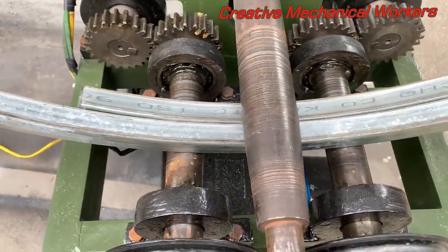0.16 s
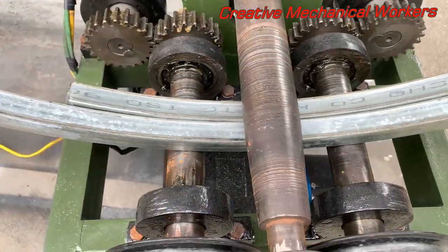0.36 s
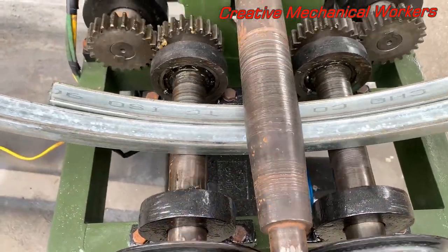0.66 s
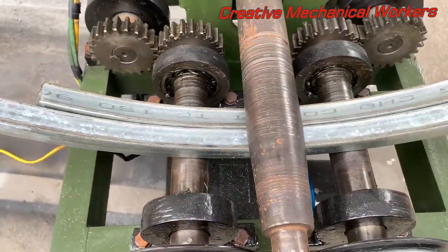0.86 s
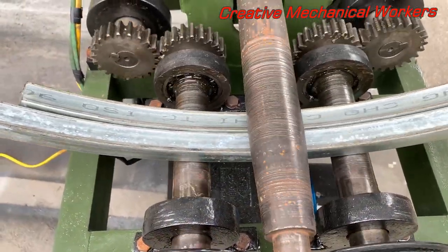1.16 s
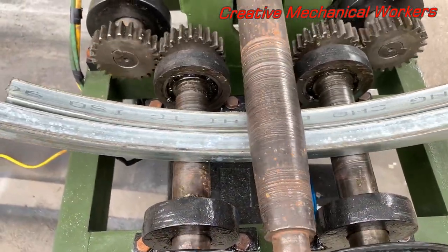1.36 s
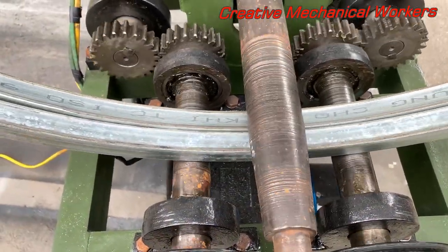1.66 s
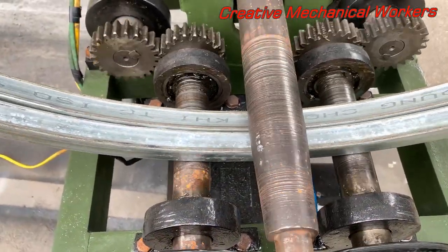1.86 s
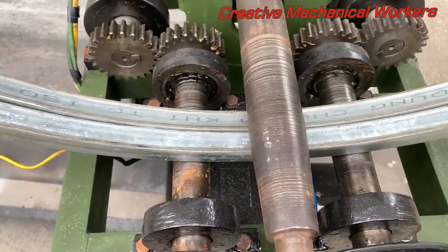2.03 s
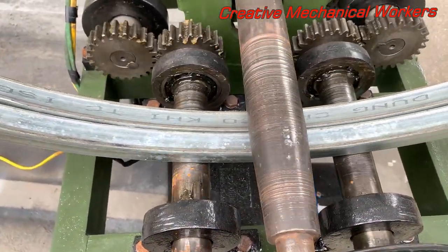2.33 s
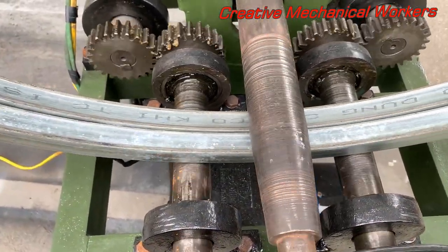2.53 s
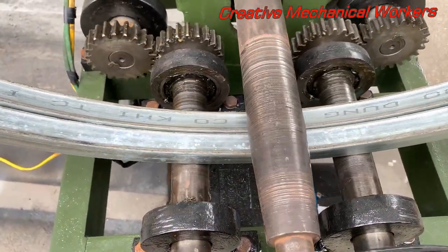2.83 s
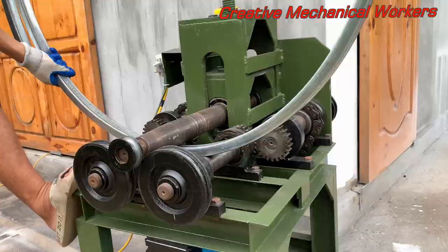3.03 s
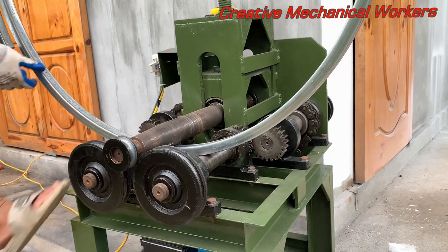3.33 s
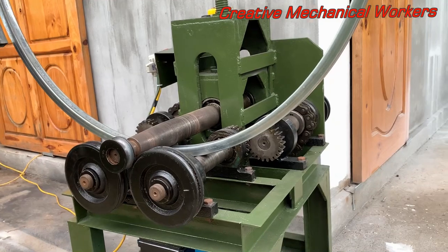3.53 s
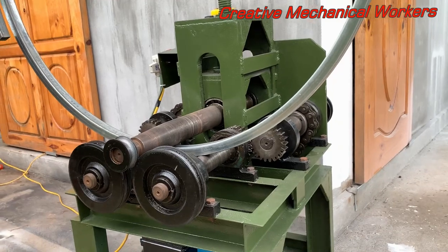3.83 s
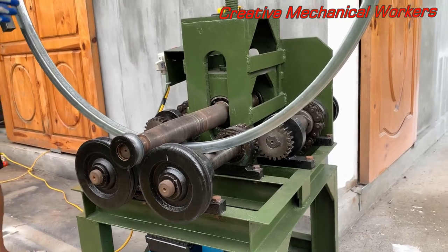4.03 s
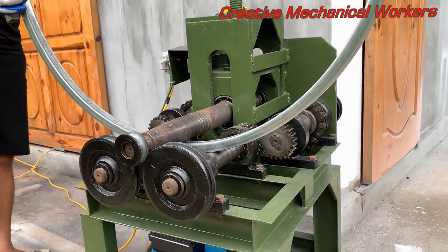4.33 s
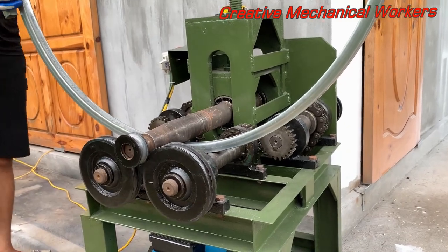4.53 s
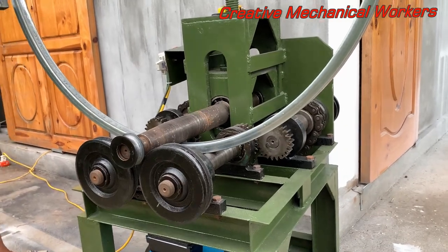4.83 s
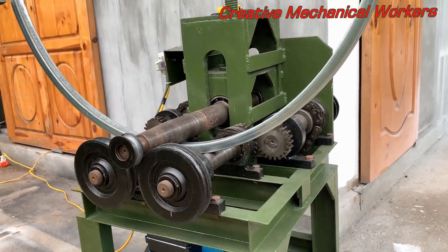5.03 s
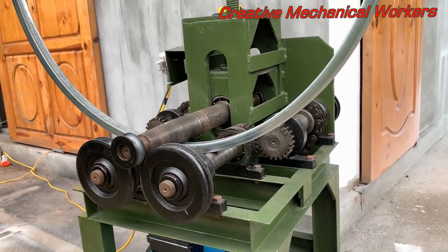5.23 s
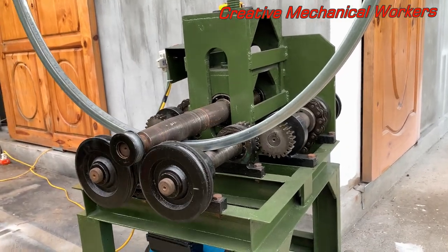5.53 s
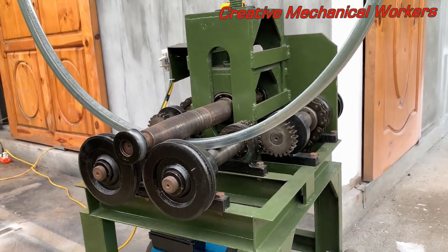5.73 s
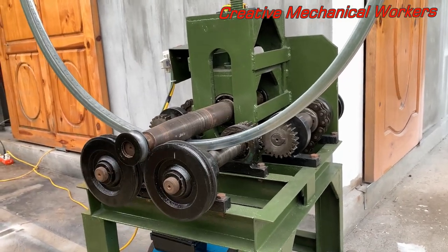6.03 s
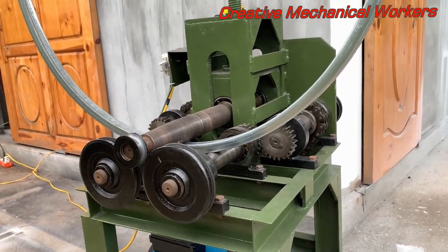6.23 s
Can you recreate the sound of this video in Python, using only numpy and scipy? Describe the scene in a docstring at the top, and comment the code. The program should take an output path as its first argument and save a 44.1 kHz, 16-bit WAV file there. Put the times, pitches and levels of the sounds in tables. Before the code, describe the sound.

An electric roller bender runs steadily, its chattering gears and ringing steel frame giving a throbbing metallic whine over rumbling bearings.

```python
"""The steel frame of an electric roller bender rings as the machine bends tube in a yard. Chattering
gear teeth drive its modes, which throb once a shaft turn, and now and then a tooth knocks hard.
Under it lie the whine of the gear mesh, the rumble and grit of bearings and rollers, and a few scuffs.
It is heard from above the rollers, then, after a short dropout, from beside the frame."""
import sys
import numpy as np
from scipy import signal
from scipy.io import wavfile
from scipy.ndimage import uniform_filter1d

SR = 44100
rng = np.random.default_rng(int(sys.argv[2]) if len(sys.argv) > 2 else 0)


def master(y):
    """Save y as 16-bit WAV."""
    cut = np.clip(np.atleast_2d(y).T, -1, 1)
    pcm = np.round(cut * 32767)  # scale
    wavfile.write(sys.argv[1], SR, pcm.astype(np.int16))


N = 281799
T = np.arange(N) / SR

# Frame modes: pitch_hz, width_hz, steadiness, swing_share, above_db, beside_db, throb_depth_above,
# throb_depth_beside, throb_phase_rad, pan_above_db, pan_beside_db (pan is left minus right)
FRAME_MODES = [(192.4, 39, 0.05, 0.57, -45, -46, .05, 0.061, -0.7, -2, -2.5),
               (395.9, 14.6, 0.69, 0.82, -32, -34, 0.37, 0.21, -0.16, 0, -2.5),
               (848, 46, 0, 0.63, -38.5, -71, 0.26, 0.15, 2.5, 1, 5),
               (932.1, 12.7, 0.7, 0.26, -34, -38.5, 0.69, 0.25, 1.8, 0, 2.5),
               (968, 13, 0, 0.86, -38, -52.5, 0.29, .2, 0.2, 2, -10),
               (1017, 42, 0.1, 0.1, -71, -43, 0.22, 0.26, 0.5, -6, -3.5),
               (1061, 41, 0, 0.29, -54.5, -42.5, 0.22, 0.51, 2.2, 1, -2),
               (1311, 150, 0.05, 1, -52.5, -40.5, 0.13, 0.18, 3.5, 10, -1),
               (1369, 146, 0, 0.57, -40, -52, 0.098, 0.13, 2.5, 3, 1),
               (1724, 22, 0, -0.5, -45, -48.5, 0.11, 0.2, 2, -4.5, -0.5),
               (1755.5, 26, 0.1, -0.5, -45.5, -48.5, 0.11, 0.2, 1, -4, -0.5),
               (1801, 32, 0, -0.93, -47, -51.5, 0.1, 0.097, 3, 7.5, -3),
               (2136, 75, 0, 0, -62, -55.5, .05, .05, 2, 4, -3),
               (2504, 81, 0, 0.14, -64, -59.5, .05, .05, 1, 0, 0),
               (2817, 80, 0.13, 0.63, -55, -51.5, .05, 0.1, -0.5, 1.5, -2.5),
               (3834, 150, 0, 0.25, -59.5, -56, .05, .05, 2, -1, 1),
               (4334, 160, 0, -0.2, -59, -58, .05, .05, 4, 4, 1.5),
               (8660, 1400, 0, -0.19, -66, -61.5, .05, 0.046, -2, -9, -6)]
# Uneven shaft, rows above and beside: rate_hz, phase_rad
SHAFT_ROTATION = [(44.81, -.2), (44.70, .25)]
# Gap between the two listening places: start_s, end_s, half_fade_out_s, half_fade_in_s, depth_db
GAP = (3.1165, 3.138, .001, .002, -34)
BESIDE = T > GAP[0] + .01


def undb(db):
    """Amplitude ratio of a level in decibels."""
    return 10 ** (np.asarray(db) / 20)


def unit(x):
    """Normalise to an rms of 1."""
    return x / np.sqrt(np.mean(np.abs(x) ** 2))


def by_place(above, beside):
    """At each instant, the value for the current listening place."""
    return np.where(BESIDE, beside, above)


def rotation(table):
    """Phase of uniform rotation, in radians, at the current listening place."""
    return by_place(*(2 * np.pi * rate_hz * T + phase for rate_hz, phase in table))


def wander(rate_hz):
    """Low-pass noise of rms 1: random steps, smoothed twice."""
    hold = int(SR / rate_hz)
    steps = np.repeat(rng.standard_normal(N // hold + 1), hold)
    return unit(uniform_filter1d(uniform_filter1d(steps, hold), hold)[:N])


def resonator(hz, width_hz):
    """Forced vibration: noise drives a damped complex pole; a second, wide pole lowers its skirts."""
    poles = np.exp((2j * np.pi * hz - np.pi * np.array([width_hz, hz / 2])) / SR)
    return unit(signal.lfilter([1], np.poly(poles), rng.standard_normal(N)))


def stereo_band(hz, width_hz, coherence, drift_hz=4.0, steadiness=0.):
    """Partial coherence: two channels share part of a resonance, with a drifting phase between them."""
    # Pull of that phase towards the centre: pitch_hz, pull_rad
    centring = [(60, .12), (400, 0.046), (1300, 0.18), (2000, 0.047)]
    pair = np.array([resonator(hz, width_hz) for _ in range(2)])
    if coherence > 0:
        common = resonator(hz, width_hz)
        angle = 2 * np.pi * (rng.random() + np.cumsum(wander(3.5 * drift_hz)) * drift_hz / SR)
        pull = np.interp(hz, *np.transpose(centring))
        turn = np.exp(1j * (angle - pull * np.sin(2 * angle)))
        shared = common * np.array([turn, np.conj(turn)])
        pair = np.sqrt(coherence) * shared + np.sqrt(1 - coherence) * pair
    if steadiness > 0:  # a mode that feeds its own chatter holds its amplitude
        pair = unit(pair / (np.abs(pair) + 0.042) ** steadiness)
    return np.sqrt(2) * pair.real


def bearings():
    """Rolling noise in third octaves; the treble flares as slow teeth bite and grit passes the rollers."""
    # Spectral density of bearings and rollers: pitch_hz, above_db_per_hz, beside_db_per_hz
    spectrum = [(25, -100, -99), (60, -79.5, -84), (117, -71, -69), (199, -66.5, -68.5), (323, -65, -70),
                (490, -81, -71.5), (634, -61.5, -72), (795, -62, -78.5), (1220, -89, -68.5),
                (1570, -73.5, -75.5), (2000, -78.5, -78.5), (3050, -80, -83), (4570, -86, -84),
                (7900, -92, -96.5), (12600, -97, -97), (16000, -100, -102)]
    # Slow roller gears, rows above and beside: tooth_rate_hz, phase_rad
    roller_teeth = [(13.9, -.2), (13.9, -.5)]
    points_hz, *densities = np.transpose(spectrum)
    tooth = rotation(roller_teeth) / (2 * np.pi)
    bite_db = 1.45 + 1.2 * rng.random(N // 1000)[np.round(tooth).astype(int)]
    contact = np.exp(14 * (np.cos(2 * np.pi * tooth) - 1))
    flare_db = bite_db * contact + wander(250) + 0.43 * wander(90)
    out, swell = 0, wander(30)
    for hz in 25 * 2 ** np.arange(0, 9.4, 1 / 3):
        width_hz = hz * (2 ** (1 / 3) - 1)
        swell = unit(0.43 * swell + 1.05 * wander(30))  # neighbouring bands swell together
        db = by_place(*(np.interp(np.log(hz), np.log(points_hz), density) for density in densities))
        db += 10 * np.log10(width_hz) + min(hz / 1800, 1) * flare_db + 1.1 * swell
        out += undb(db) * stereo_band(hz, 1.3 * width_hz, coherence=.55 if hz < 2000 else 0)
    return out


def scuffs():
    """Sliding friction: short grainy rasps, as of a sole or the tube dragged over concrete."""
    # Scuffs: peak_s, rise_s, fade_s, level_db
    drags = [(0.213, .004, .005, -50), (0.64, .004, .005, -44), (1.861, .004, .006, -43),
             (2.082, .004, .005, -51), (2.957, .002, .006, -43), (3.015, 0.0054, 0.03, -43),
             (3.965, .015, .012, -49), (4.012, .01, 0.023, -45), (4.062, 0.0067, .012, -41),
             (4.088, 0.023, 0.031, -36), (4.128, .01, .012, -52), (4.182, .004, .008, -51),
             (5.2, .015, .025, -47), (5.618, .003, .004, -51), (5.762, .003, .004, -49),
             (5.82, .004, .006, -53)]
    # Bands of the friction noise: pitch_hz, width_hz, relative_db
    rasp_bands = [(2100, 870, 5.5), (3650, 520, 1), (8400, 4200, 2.5), (14200, 2500, -0.5)]
    envelope = 0
    for peak_s, rise_s, fade_s, db in drags:
        slope_s = np.where(T < peak_s, rise_s, fade_s)
        envelope += undb(db) * np.exp(-np.abs((T - peak_s) / slope_s) ** 1.2)
    rasp = sum(undb(db) * stereo_band(hz, width_hz, coherence=0) for hz, width_hz, db in rasp_bands)
    grain = undb(2 * wander(200))
    return envelope * grain * unit(rasp)


def gearbox():
    """Amplitude modulation: the uneven shaft gives some of the thin gear-mesh tones sidebands."""
    # Mesh tones: pitch_hz, width_hz, above_db, beside_db, depth_once_a_turn, depth_twice_a_turn, phase_rad
    mesh_tones = [(1293, 4, -70, -53, 0, 0, 0), (1327, 9, -70, -52, 0, 0, 0), (1342, 6, -70, -55, 0, 0, 0),
                  (1364, 3, -70, -47.5, .6, .8, -1.6), (1369, 4, -46, -70, .2, .2, 0),
                  (1372, 4, -70, -53, 0, 0, 0), (1377.5, 4, -49, -70, -1.6, 1.1, 2.1),
                  (1386, 5, -54, -56, 0, 0, 0)]
    shaft, out = rotation(SHAFT_ROTATION), 0
    for hz, width_hz, above_db, beside_db, once, twice, phase in mesh_tones:
        throb = 1 + once * np.cos(shaft + phase / 2) + twice * np.cos(2 * shaft + phase)
        tone = stereo_band(hz, width_hz, coherence=0.7, drift_hz=0.98)
        out += undb(by_place(above_db, beside_db)) * throb * tone
    return out


def tooth_knocks():
    """Impact excitation: a tooth's short push rings modes near the struck part's pitch; contact damps them."""
    # Hard tooth landings: start_s, relative_db, struck_hz
    impacts = [(0.06, -33, 929), (0.189, -20, 923), (0.328, -15, 939), (0.371, -19, 918), (0.438, -12, 934),
               (0.575, -21, 939), (0.613, -16, 937), (0.655, -24, 918), (0.795, -24, 945),
               (0.839, -23, 929), (1.153, -23, 918), (1.527, -16, 969), (1.777, -16, 926),
               (1.866, -20, 926), (1.913, -15, 926), (2.045, -24, 942), (2.134, -20, 926),
               (2.205, -22, 929), (2.265, -22, 950), (2.846, -18, 931), (2.894, -18, 931),
               (3.028, -25, 942), (3.612, -27, 934), (3.937, -25, 1290), (4.331, -26, 1070),
               (4.386, -31, 929), (4.447, -25, 923), (4.587, -26, 1310), (4.62, -24, 940),
               (5.004, -23, 1050), (5.113, -28, 1010), (5.227, -28, 931), (5.828, -23, 966),
               (5.954, -24, 945), (6.122, -26, 931), (6.344, -15, 931)]
    gain_db, push_s, damping_hz, reach_octaves = -7, 0.0027, 25, 0.33
    start_s, hit_db, struck_hz = np.transpose(impacts)
    onsets, out = (start_s * SR).astype(int), 0
    loudest_db = by_place(max(mode[4] for mode in FRAME_MODES), max(mode[5] for mode in FRAME_MODES))
    for hz, width_hz, _, _, above_db, beside_db, *_ in FRAME_MODES:
        mode_db = (by_place(above_db, beside_db) - loudest_db)[onsets]
        coupling = np.exp(-(np.log2(hz / struck_hz) / reach_octaves) ** 2)
        phasors = np.exp(2j * np.pi * rng.random(len(onsets)))
        force = np.zeros(N, complex)
        force[onsets] = undb(hit_db + gain_db + mode_db / 2) * coupling * phasors
        decay_rates = np.array([np.pi * (width_hz + damping_hz), 1 / push_s])
        poles = np.exp((2j * np.pi * hz - decay_rates) / SR)
        out += signal.lfilter([1 - abs(poles[1])], np.poly(poles), force).real
    return out


def frame():
    """Modal resonance: tooth chatter drives each mode, and the uneven shaft modulates it once a turn."""
    # Slow swing in how hard the frame rings: time_s, level_db
    swing = [(0, -0.5), (.35, 5.5), (.75, -0.5), (1.6, 3.5), (1.9, -2.5), (2.5, 0.5), (3.1, -3), (3.8, -2),
             (4.45, 0), (5.1, -2), (5.9, -2.5), (6.39, -1.5)]
    # Slow wheel that shakes the modes near 1.75 kHz, rows above and beside: rate_hz, phase_rad
    idler = [(10.2, .2), (10.2, 1.9)]
    swing_db = np.interp(T, *np.transpose(swing))
    shaft, rattle, out = rotation(SHAFT_ROTATION), wander(28.01), 0
    for (hz, width_hz, steadiness, swing_share, above_db, beside_db,
         depth_above, depth_beside, phase, *pan_db) in FRAME_MODES:
        db = swing_share * swing_db + by_place(above_db, beside_db)
        db = db + by_place(*pan_db) * np.array([[.5], [-.5]])
        throb = 1 + by_place(depth_above, depth_beside) * np.cos(shaft + phase)
        if 1700 < hz < 1850:
            throb *= 1 + 0.18 * np.cos(rotation(idler))
        if hz > 2000:
            db += 2.5 * wander(45)  # the high modes come and go
        elif hz > 800:
            db += 1.28 * rattle  # the middle modes rattle in shared bursts
        coherence = .85 if hz < 2000 else .3
        out += undb(db) * throb * stereo_band(hz, width_hz, coherence, steadiness=steadiness)
    return out


def scene():
    """Superposition: the pressures of all sources add in each channel."""
    return frame() + tooth_knocks() + gearbox() + bearings() + scuffs()


def record(dry):
    """Attenuation: the sound dips into faint hiss between the places; a steep low-pass cuts the top."""
    start_s, end_s, out_s, in_s, depth_db = GAP
    hiss_db, cutoff_hz = -64, 15750
    corners_s = [start_s - out_s, start_s + out_s, end_s - in_s, end_s + in_s]
    gain = undb(np.interp(T, corners_s, [0, depth_db, depth_db, 0]))
    hiss = (1 - gain) * undb(hiss_db) * rng.standard_normal(dry.shape)
    lowpass = signal.ellip(16, .2, 92, cutoff_hz, fs=SR, output="sos")
    return signal.sosfilt(lowpass, gain * dry + hiss)


dry = scene()
out = record(dry)
master(out)
```